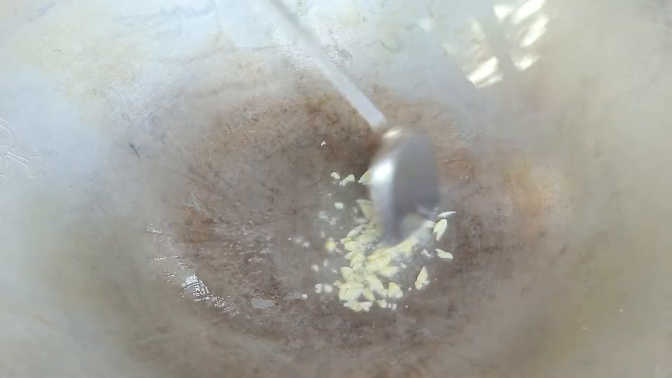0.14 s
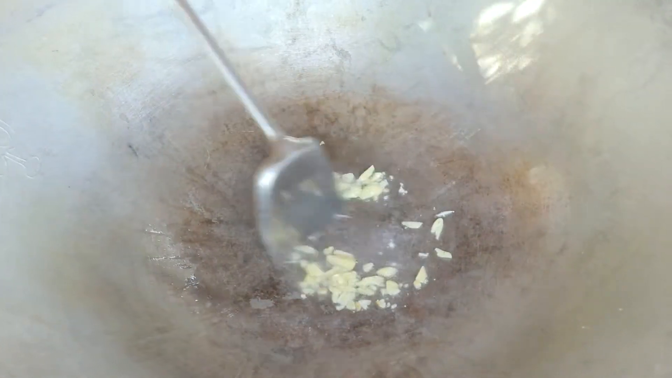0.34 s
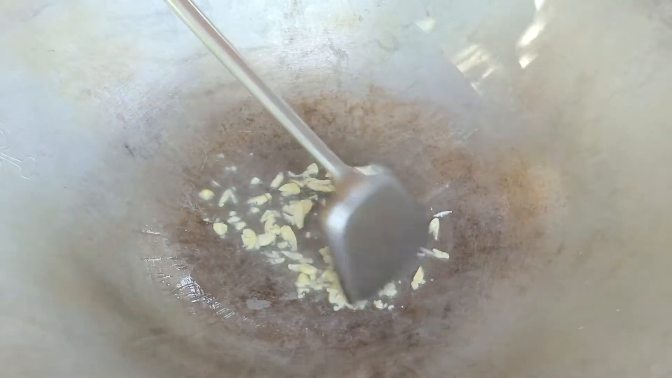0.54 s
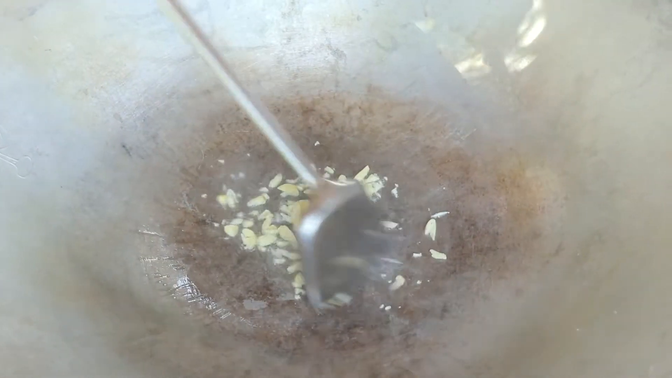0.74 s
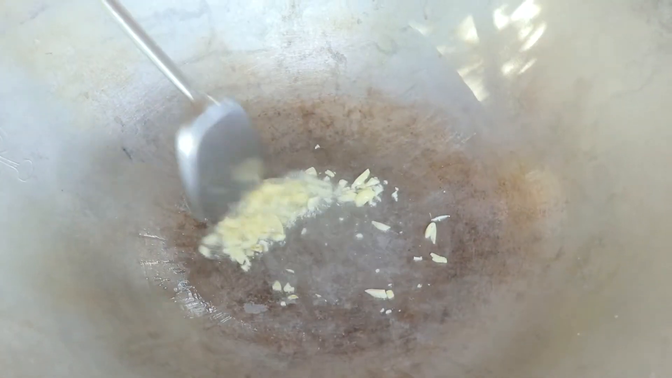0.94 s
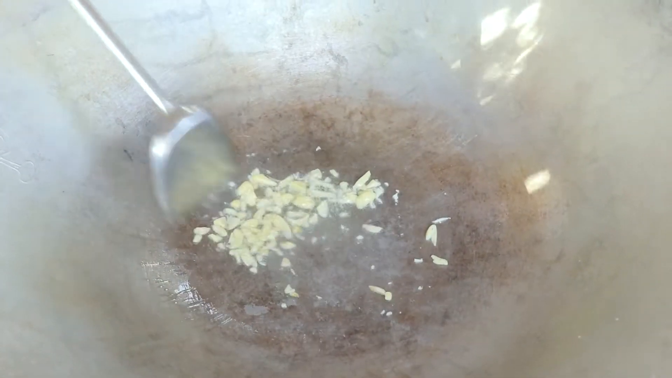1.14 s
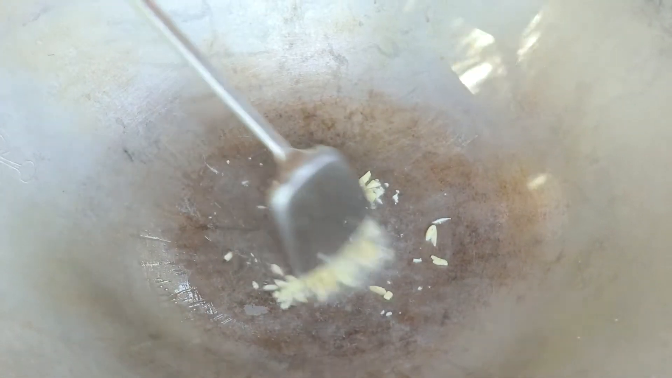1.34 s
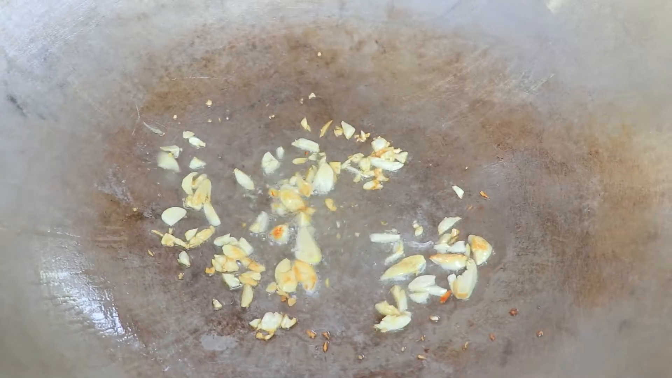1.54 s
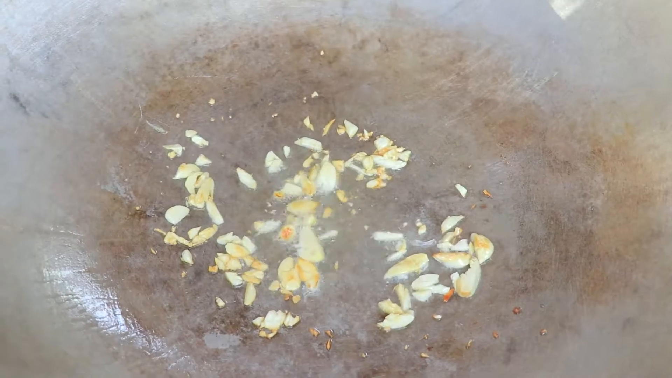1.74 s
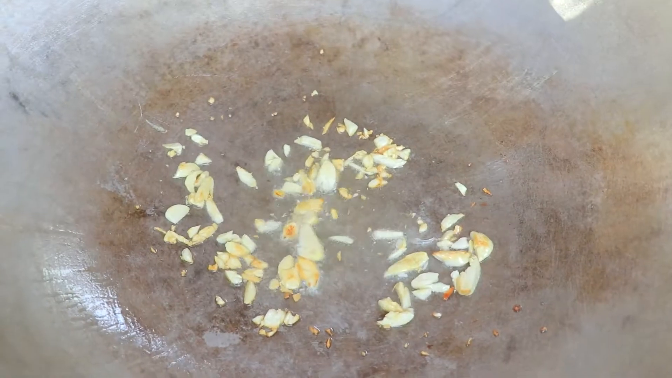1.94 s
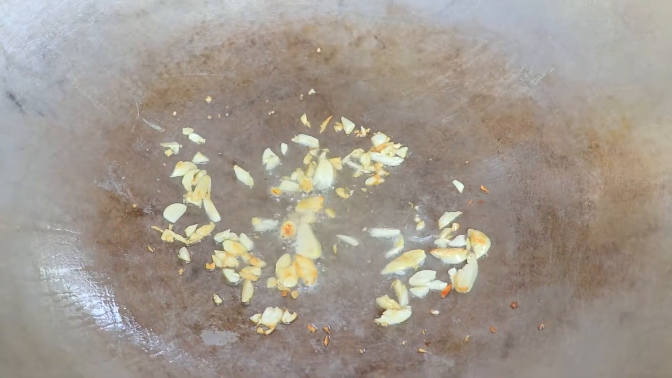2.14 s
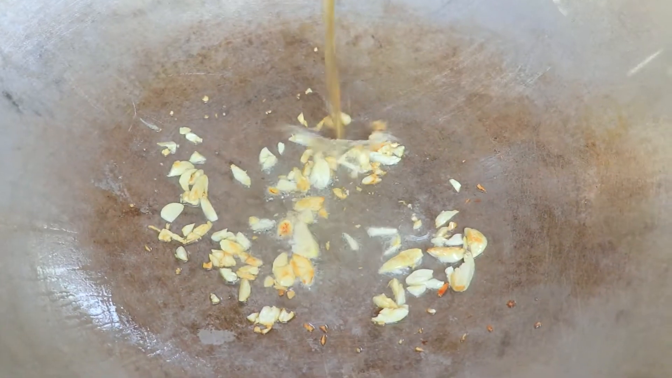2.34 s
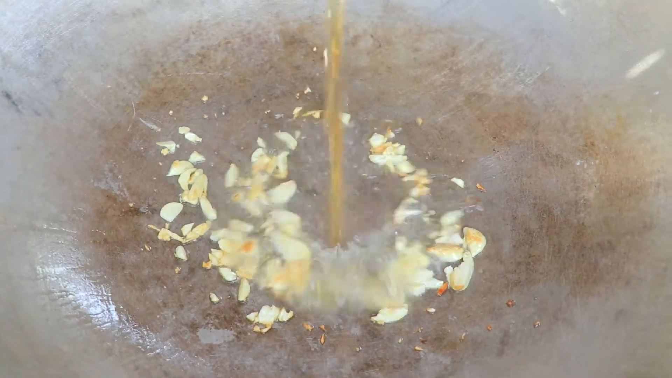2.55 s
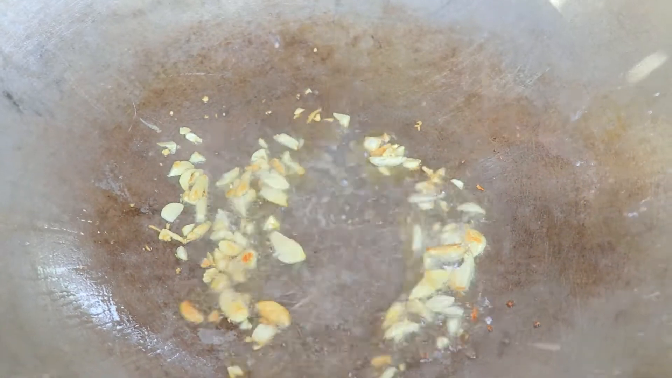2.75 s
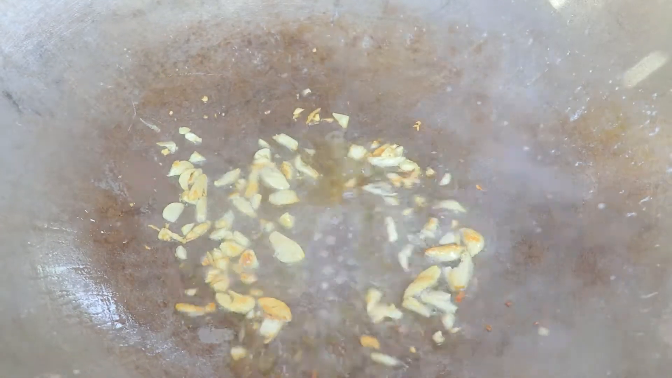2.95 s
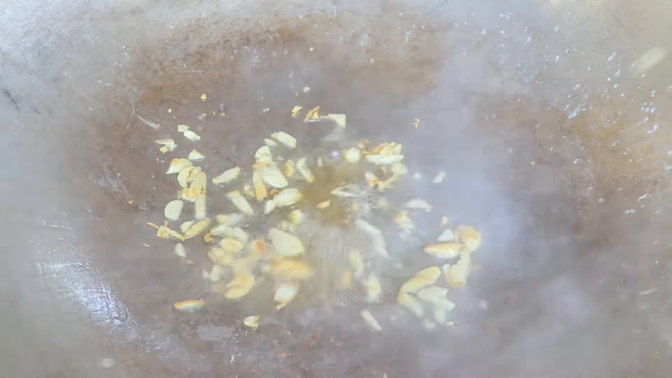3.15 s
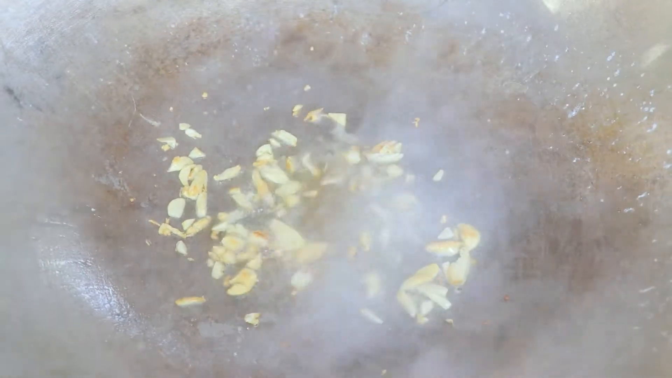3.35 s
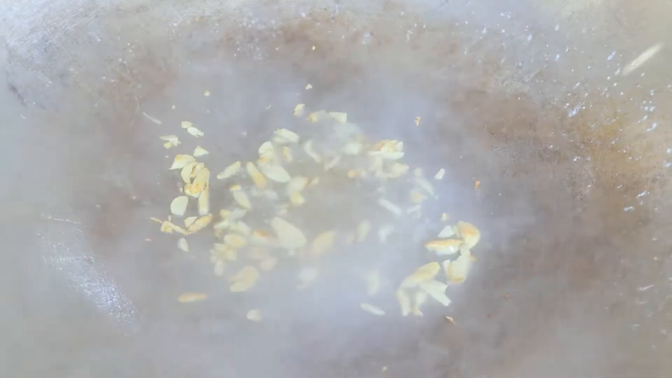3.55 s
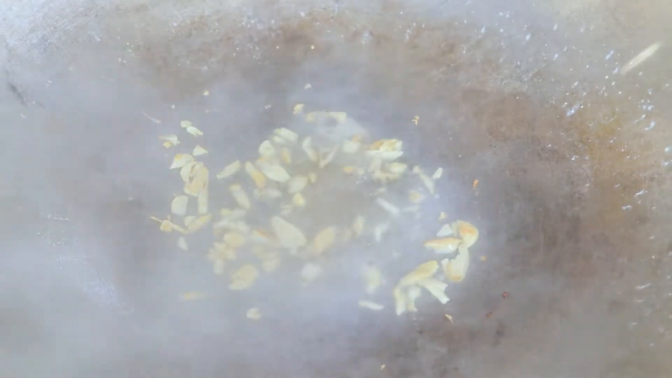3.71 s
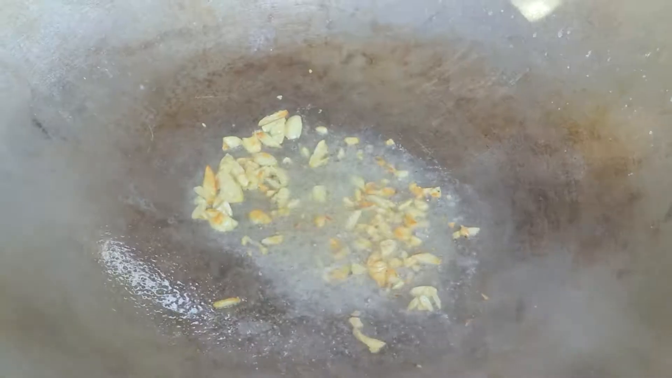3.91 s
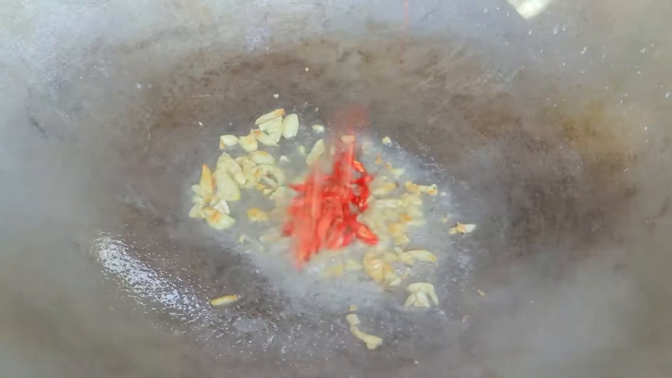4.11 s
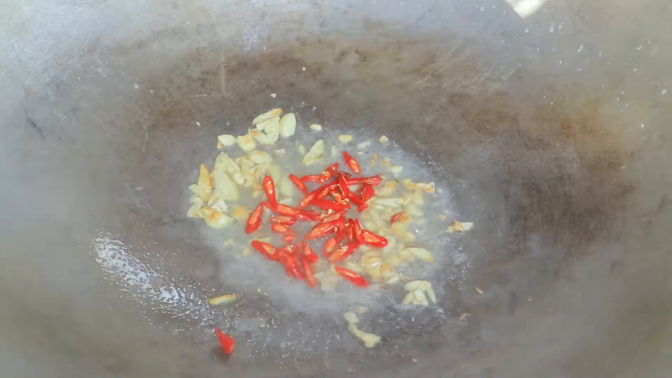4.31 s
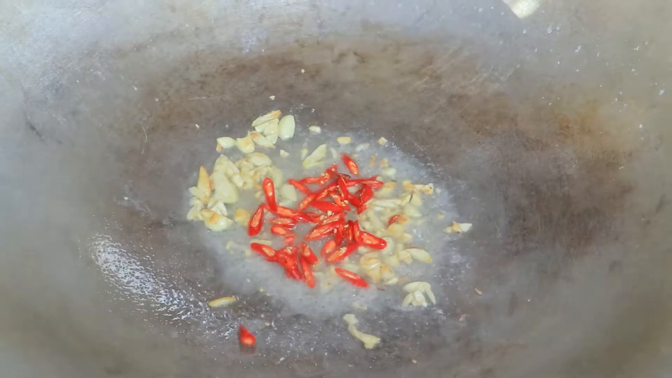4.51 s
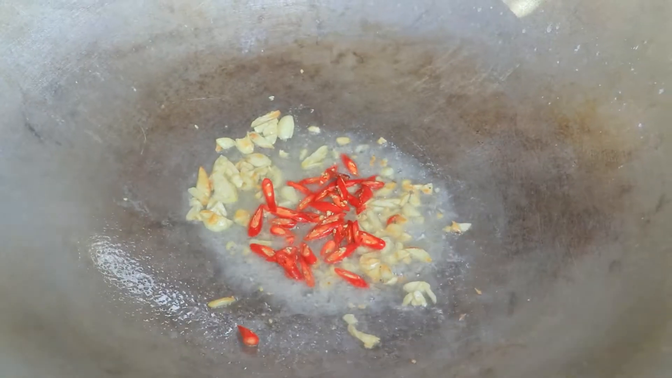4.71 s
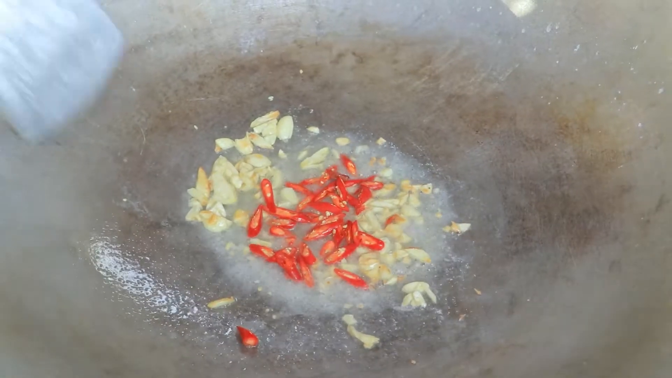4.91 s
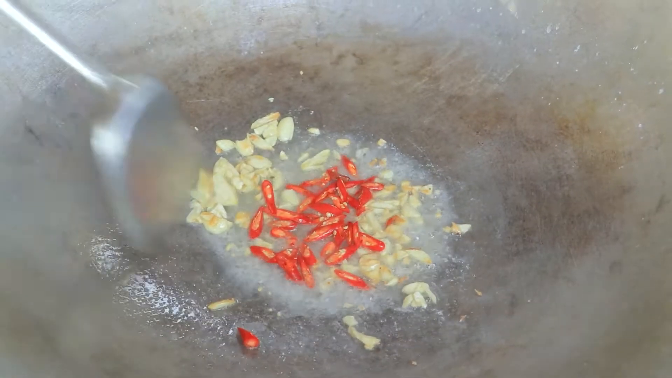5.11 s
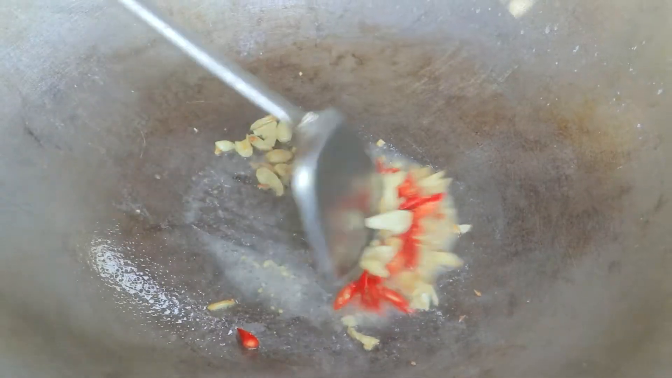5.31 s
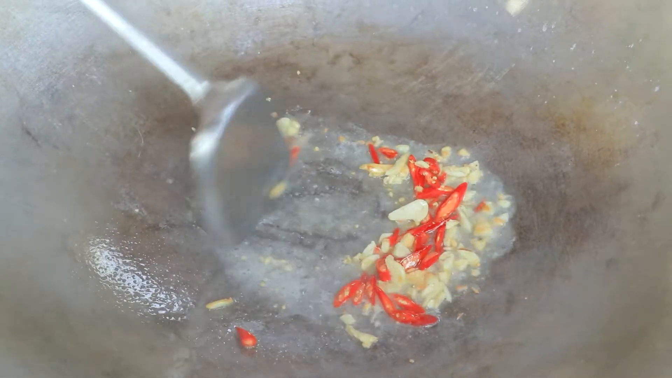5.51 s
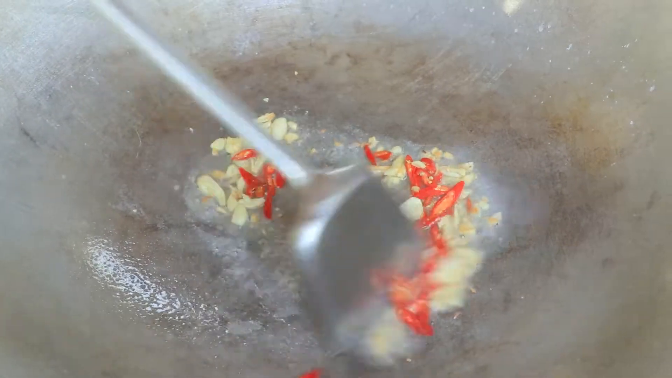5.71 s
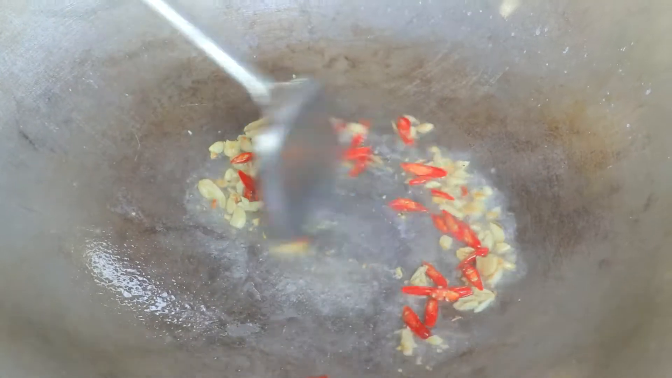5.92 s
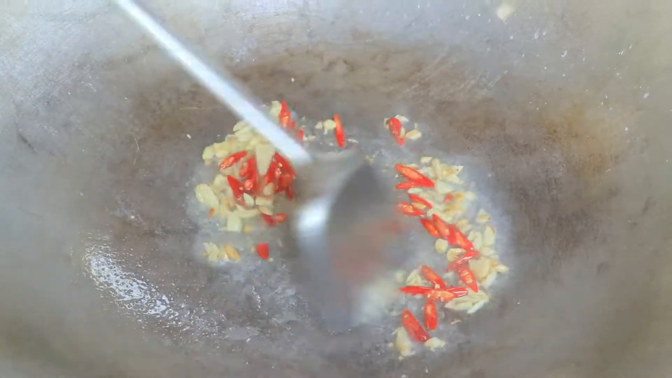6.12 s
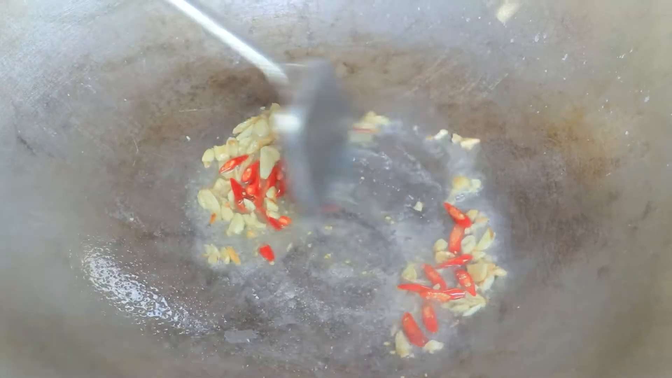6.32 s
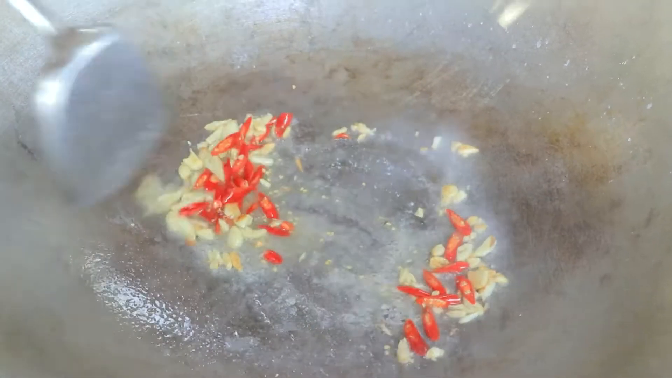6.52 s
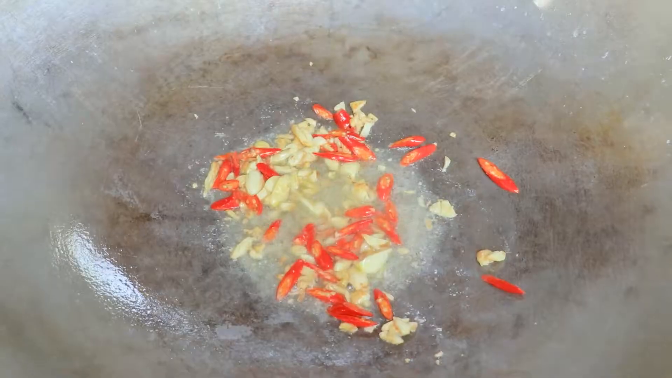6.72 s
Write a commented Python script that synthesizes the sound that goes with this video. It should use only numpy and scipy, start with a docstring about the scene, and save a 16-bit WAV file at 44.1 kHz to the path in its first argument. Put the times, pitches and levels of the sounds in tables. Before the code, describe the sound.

Garlic fries with a bright, crackling sizzle while a metal spatula scrapes and hits a steel wok with loud, overdriven clangs. It cuts to quiet oil ticking and spitting, then liquid is poured in and swells into a loud boiling hiss. Abruptly calmer, wet frying follows: chillies plop in, the spatula clanks twice and scrapes in long strokes. A close microphone outdoors, sound almost entirely in the left channel.

```python
"""Garlic fries in a steel wok outdoors: snaps and sizzle, scrapes and clangs of a spatula, spitting oil,
then liquid is poured in and boils up, and chillies are stirred in. The stages follow each other abruptly.
The sizzle is many tiny bursts plus hiss; snaps, spits and plops are short noise; scrapes are shaped noise;
blows mix noise with dying notes. One close microphone feeds the left channel, and the hardest blows
drive it into its limiter. The right channel carries only a trace."""
import sys
import numpy as np
from scipy import signal
from scipy.fft import rfft, irfft, next_fast_len
from scipy.io import wavfile
from scipy.ndimage import uniform_filter1d, minimum_filter1d, map_coordinates

SR = 44100
rng = np.random.default_rng(int(sys.argv[2]) if len(sys.argv) > 2 else 0)


def dump(signal):
    """Clip the signal to [-1, 1] and save it as 16-bit WAV at the path in sys.argv[1]."""
    limited = np.clip(np.atleast_2d(signal).T, -1, 1)
    pcm = np.round(limited * 32767).astype(np.int16)
    wavfile.write(sys.argv[1], SR, pcm)


N = 302526
TOP_HZ = 15850  # nothing is heard above this pitch

# All levels in the tables are relative: later gains still act on them.
# Colours of the sizzle: (frequency [Hz], gain [dB])
FRYING = [(88, -21), (150, -5), (193, -25), (302, -15.5), (404, -15.5), (561, -11), (1020, -7.5),
          (1240, -4.5), (2860, 0.5), (3550, -3), (4840, 1), (6470, -7.5), (7560, -5), (15500, -17.5)]
QUIET_OIL = [(290, -44), (500, -8.5), (927, -16), (1030, -19), (1450, -10), (2390, 0.5), (3530, -3),
             (5050, -0.5), (6550, -10), (7450, -7.5), (15500, -22)]
BOILING = [(71, -61), (120, -34), (260, -18), (432, -20), (498, -13.5), (1270, -6.5), (1650, -6.5),
           (2290, 0), (3050, 0), (3580, -6), (5170, -4), (6460, -10.5), (8770, -11), (11000, -16.5),
           (15500, -18.5)]
WET_OIL = [(120, -27), (200, -22), (392, -18.5), (596, -12), (653, -18), (769, -9.5), (974, -11),
           (1050, -8), (1650, -6), (1950, -1.5), (3890, -3.5), (4840, 0.5), (6470, -6), (7480, -4.5),
           (15500, -16)]
SIMMERING = [(180, -49), (300, -23), (863, -13.5), (1260, -12), (1460, -10), (1560, -17), (1870, -4),
             (3690, -6), (3870, -6), (5570, -2.5), (15500, -20.5)]
# Stages of the sizzle. Each drifts slowly in level; only the poured liquid builds up gradually,
# the other stages start at once:
# (start [s], end [s], colour, level above 6.5 kHz [dB], build-up time [s], drift [dB/s],
# bursts [1/s], spread of burst strength [dB], share of bursts in the power [0-1])
STAGES = [(0, 1.464, FRYING, -40, 0.00068, -3, 2970, 3, 0.62),
          (1.448, 2.421, QUIET_OIL, -59.5, .002, -5, 1700, 1, 0.3),
          (2.38, 3.863, BOILING, -31.5, 0.46, -1.4, 4260, 0.5, 0.36),
          (3.862, 6.672, WET_OIL, -42, .001, 0.29, 4000, 2.5, 0.09),
          (6.698, 6.9, SIMMERING, -47.5, .001, -2, 4700, 1, 0.08)]
# Colour of the bowl's low thud and rumble: (frequency [Hz], gain [dB])
BOWL = [(40, -53), (90, -23), (125, -2.5), (190, -2), (265, -2.5), (420, -8), (620, -13.5), (1000, -23),
        (4000, -67)]


def amp(db):
    """Decibels to gain."""
    return 10 ** (np.asarray(db) / 20)


def unit(x):
    """x scaled to an average strength (rms) of 1."""
    return x / np.sqrt(np.mean(x ** 2) + 1e-20)


def add(track, s, sound):
    """Mix a sound into the track at s seconds."""
    room = track[max(round(s * SR), 0):][:len(sound)]
    room += sound[:len(room)]


def gate(start, end, edge=0.0022):
    """1 between two times, with short ramps of edge seconds."""
    t = np.arange(N) / SR
    return np.clip(np.minimum(t - start, end - t) / edge + .5, 0, 1)


def bell(s, spread):
    """A smooth bell-shaped swell that reaches 1 at s seconds."""
    return np.exp(-.5 * ((np.arange(N) / SR - s) / spread) ** 2)


def wobble(rate):
    """A smooth random curve through rate random points a second."""
    knots = rng.standard_normal(int(N * rate / SR) + 4)
    steps = np.arange(0, N, 32)
    curve = map_coordinates(knots, [steps * rate / SR])
    return np.interp(np.arange(N), steps, curve)


def filtered(x, response):
    """x with each frequency multiplied by response(frequency)."""
    m = next_fast_len(len(x) + SR // 4)
    return irfft(rfft(x, m) * response(np.fft.rfftfreq(m, 1 / SR)), m)[:len(x)]


def coloured(x, points, size=4096):
    """x through a filter with the gain of the (Hz, dB) points and no sound ahead of its cause."""
    hz, db = np.transpose(points)
    gain = amp(np.interp(np.log(np.fft.rfftfreq(size, 1 / SR) + 1), np.log(hz), db))
    # Folding the cepstrum (the spectrum of the log gain) packs the filter's energy at its start.
    cepstrum = irfft(np.log(gain + 1e-6))[:size // 2]
    cepstrum[0] /= 2
    impulse = irfft(np.exp(rfft(2 * cepstrum, size)))
    return signal.fftconvolve(x, impulse)[:len(x)]


def band_unit(x, lo, hi):
    """x scaled so that the band from lo to hi Hz has rms 1."""
    return x / np.std(filtered(x, lambda hz: (hz > lo) & (hz < hi)))


def resonance(f, hz, width):
    """Response of one resonance, 1 at its centre."""
    return 1j * f * width / (hz * hz - f * f + 1j * f * width)


def burst(t60):
    """White noise that starts at once and falls by 60 dB in t60 seconds."""
    t = np.arange(SR // 4) / SR
    return rng.standard_normal(len(t)) * amp(-60 * t / t60)


def grains(rate, spread_db, length, life=0.00023, size=40):
    """Tiny bursts of every pitch, most weak and a few strong, scaled to rms 1."""
    when, pitch, chance = rng.random((int(rate * length / SR), 3)).T
    t = np.arange(size) / SR
    strength = amp(-spread_db * np.log(chance + .006))
    waves = np.cos(2 * np.pi * TOP_HZ * pitch[:, None] * t) * np.exp(-t / life)
    waves = strength[:, None] * waves
    places = (when * length).astype(int)[:, None] + np.arange(size)
    return unit(np.bincount(places.ravel(), waves.ravel(), length)[:length])


def patchy(x, depth_db, size, count):
    """x with patches of its spectrum that come and go, each lasting about count frames."""
    z = signal.stft(x, nperseg=size)[2]
    field = uniform_filter1d(rng.standard_normal(z.shape), 2, axis=0)
    field = uniform_filter1d(field, count, axis=1)
    return signal.istft(z * amp(depth_db * unit(field)), nperseg=size)[1][:N]


def puff(sound, size=220):
    """A sound scaled so that its first 5 ms peak near 1."""
    return sound / (np.sqrt(2 * np.pi) * np.std(sound[:size]))


def even(x, size=1100):
    """x held near rms 1, as under a steady hand."""
    return x / np.sqrt(np.abs(uniform_filter1d(x ** 2, size)) + 1e-9)


def sizzle():
    """Bubbles burst over a hiss of steam, in proportions, colour and level set by each stage."""
    # The sizzle swells or dips as the food shifts: (time [s], level change [dB], spread in time [s])
    swells = [(.85, 0.5, 0.29), (1.422, -2, 0.057), (4.64, 0.5, 0.14), (5.297, -1.5, 0.19),
              (6.358, 1.5, 0.11)]
    coarse_hz, coarse_build_s = 2100, 0.23  # in poured liquid the large, low bubbles come later
    out = np.zeros(N)
    for start, end, colour, level_db, build_s, drift_db, rate, spread_db, share in STAGES:
        fade = gate(start, end)
        span = np.flatnonzero(fade)
        age = np.arange(len(span)) / SR
        bubbles = grains(rate, spread_db, len(span))
        steam = rng.standard_normal(len(span))
        fizz = np.sqrt(share) * bubbles + np.sqrt(1 - share) * steam
        fizz = band_unit(coloured(fizz, colour), 6500, 15000)
        if colour == BOILING:
            coarse = filtered(fizz, lambda hz: 1 / (1 + (hz / coarse_hz) ** 2))
            fizz = fizz - np.exp(-age / coarse_build_s) * coarse
        build_up = 1 - np.exp(-age / build_s)
        out[span] += fade[span] * build_up * amp(level_db + drift_db * age) * fizz
    swell_db = sum(db * bell(s, spread) for s, db, spread in swells)
    unsteady = out * amp(swell_db + 0.62 * wobble(45))
    return patchy(unsteady, depth_db=0.8, size=256, count=8)


def snaps(count=36):
    """Frying garlic cracks in sharp noise bursts: some set loud ones, and small ones at random."""
    # The loudest dry snaps: (time [s], peak level [dB])
    loud = [(0.35, -18), (.278, -14), (.378, -16), (.488, -18), (.5955, -24), (.867, -14), (0.885, -17),
            (0.924, -18), (.965, -14.5), (1.074, -11), (1.152, -17), (1.2333, -11), (1.294, -16)]
    loudest_db, range_db = -22.5, 13  # small snaps: loudest peak, range below it
    out = np.zeros(N)
    small = [(when * STAGES[0][1], loudest_db - range_db * weak) for when, weak in rng.random((count, 2))]
    for s, db in loud + small:
        crack = burst(t60=.0018) + .04 * burst(t60=.025)
        crack = coloured(crack, [(150, -33), (1300, 2.5), (3000, 1.0), (5500, 2), (9000, -13), (15000, -16)])
        add(out, s, amp(db) * crack / abs(crack).max())
    return out


def scrapes():
    """The edge slips over steel, louder with each push; resonances shift and the bowl rumbles."""
    # Colours of the grating in a dry and a wet pan: (frequency [Hz], gain [dB])
    dry_grating = [(100, -61), (400, -38), (560, -17), (950, -21), (1080, -4), (1400, -7.5), (1700, 0),
                   (1880, -4.5), (2150, 3.5), (2650, 0), (3200, -0.5), (3700, -11.5), (5200, -11.5),
                   (9000, -40), (15000, -60)]
    wet_grating = [(100, -36.5), (430, -64), (650, -10), (790, -19), (950, -14), (1090, -6.5), (1380, -2),
                   (1560, -7), (2050, -2), (2400, 1.5), (3050, -5.5), (3800, -12.5), (5300, -16),
                   (12000, -37)]
    # Drags of the spatula: (touch [s], lift [s], scrape level [dB], rumble level of the bowl [dB],
    # fading of the rumble [dB/s], state of the pan)
    drags = [(0.042, 0.359, -32, -42.5, 23, "dry"), (0.378, 0.413, -32.5, -60, 0, "dry"),
             (0.805, 0.939, -36.5, -44.5, 132, "dry"), (1.112, 1.15, -38, -43, 100, "dry"),
             (1.185, 1.448, -39.5, -55, 67, "dry"), (5.463, 6.387, -33, -46.5, -2.5, "wet")]
    # Pushes of the hand, each a smooth swell of the scrape: (time [s], level [dB], spread in time [s])
    pushes = [(0.172, -28.5, 0.043), (0.262, -26.5, 0.028), (0.338, -30.5, 0.023), (0.815, -28.5, 0.029),
              (1.203, -32, 0.014), (5.5, -25, 0.03), (5.67, -28.5, .04), (5.762, -27, 0.015),
              (5.962, -24, 0.04), (6.12, -23, 0.046), (6.332, -22.5, 0.03)]
    # The blade chatters and makes the bowl drone: (time [s], pitch [Hz], level [dB], spread in time [s])
    squeals = [(0.278, 2640, -25, 0.0086), (.927, 3120, -25.5, 0.0031), (1.363, 3010, -28, 0.0043),
               (5.495, 2340, -27, 0.016), (5.7, 1783, -29.5, 0.023), (5.712, 138.5, -40, 0.031),
               (5.937, 2310, -26, 0.035), (6.149, 2040, -20.5, 0.028)]
    # The bowl's note wanders with the point of contact.
    drone_hz, drone_wander_hz, wander_per_s = 269.4, 27.96, 9

    slips = grains(1200, spread_db=1.5, length=N) + 0.5 * rng.standard_normal(N)
    slips = patchy(slips * amp(1.6 * wobble(110)), depth_db=4.5, size=2048, count=4)
    dry_scrape, wet_scrape, rumble = [even(coloured(slips, c)) for c in (dry_grating, wet_grating, BOWL)]
    phase = 2 * np.pi * np.cumsum(drone_hz + drone_wander_hz * wobble(wander_per_s)) / SR
    note = wobble(50) * np.sin(phase) + wobble(50) * np.cos(phase)
    drone = 0.81 * note + 0.63 * rumble

    out, t = np.zeros(N), np.arange(N) / SR
    push_power = sum((amp(db) * bell(s, spread)) ** 2 for s, db, spread in pushes)
    for touch, lift, scrape_db, rumble_db, fading_db, state in drags:
        grate, low = (wet_scrape, drone) if state == "wet" else (dry_scrape, rumble)
        force = np.sqrt(amp(scrape_db) ** 2 + push_power)
        age = np.clip(t - touch, 0, lift - touch)
        out += gate(touch, lift) * (force * grate + amp(rumble_db - fading_db * age) * low)
    waver = 0.59 * wobble(130)
    for s, hz, db, spread in squeals:
        out += amp(db) * bell(s, spread) * np.sin(2 * np.pi * hz * t + waver)
    return out


def blows():
    """Steel on steel: a crash, a short note of the blade, a thud of the bowl and the modes of the wok."""
    # Blows of the spatula: (time [s], level [dB], thud level against the crash [dB],
    # pitch of the blade [Hz], time for the crash to fall by 60 dB [s])
    hits = [(0.659, -5.5, -9.5, 1930, 0.075), (0.6648, -1, -21, 2820, 0.04), (0.688, -26, -2, 2020, 0.034),
            (0.798, -20, -10, 2670, 0.047), (1.1638, -6.5, -7.5, 1900, 0.03), (1.168, -9, -19, 2494, 0.055),
            (1.202, -17, -19, 2500, 0.069), (1.234, -21, -10, 1680, 0.027), (5.1213, -5, -14.5, 2526, 0.06),
            (5.1403, -8, -35, 2100, 0.045), (5.1434, -13, -29, 2580, 0.077),
            (5.467, -28.5, -7.5, 2220, .05), (5.733, -24, -28, 2200, 0.045)]
    # The wok rings on where the blade bounces clear:
    # (time [s], pitch [Hz], level [dB], time to fall by 60 dB [s], rise time [s], width of the note [Hz])
    rings = [(.674, 1072, -10.5, .22, .026, .8), (1.166, 1911, -22, .15, .004, 6),
             (5.122, 4346, -17, .07, .002, 12), (5.14, 1238, -32, .28, .008, 14),
             (5.14, 1440, -24, .22, .008, 14), (5.14, 2550, -16, .09, .002, 10),
             (5.14, 3435, -23, .17, .004, 8), (5.14, 4070, -21, .08, .002, 10)]
    # Modes, the wok's own notes: (pitch [Hz], relative level [dB], time to fall by 60 dB [s])
    steel = [(123, -11.5, 0.24), (173, -7.5, 0.12), (281, -14.5, 0.14), (1062, -4, 0.31),
             (1250, -10.5, 0.84), (1460, -16.5, 0.68), (1738, -8, 0.2), (1903, 1.5, 0.21), (2060, -7, 0.35),
             (2390, -1, 0.15), (2570, -16, 0.17), (2710, -14, 0.35), (3360, -5, 0.34), (3580, -19, 0.31),
             (3900, -16, 0.091), (4270, -6, 0.078)]
    # Colour of the crash: (frequency [Hz], gain [dB])
    crash_colour = [(80, -46), (500, -21.5), (700, -15.5), (1050, -9.5), (1450, -16), (1900, -12.5),
                    (2250, -3), (2600, -3), (3100, -10.5), (4200, -10.5), (5500, -11.5), (6300, -21.5),
                    (9000, -20.5), (15500, -42)]
    out, t = np.zeros(N), np.arange(SR // 4) / SR

    def swell(rise):
        """A soft start that builds up over about rise seconds."""
        return 1 - np.exp(-t / rise)

    def tone(hz, t60, width_hz):
        """A dying note; the rattling contact makes its phase wander."""
        wander = np.cumsum(rng.standard_normal(len(t))) * np.sqrt(2 * np.pi * width_hz / SR)
        wave = np.sin(2 * np.pi * (hz * t + rng.random()) + wander)
        return wave * np.exp(-np.log(1000) * t / t60)

    for s, db, thud_db, blade_hz, crash_t60 in hits:
        crash = burst(crash_t60) + 0.097 * burst(3 * crash_t60)
        crash = puff(coloured(crash, crash_colour))
        thud = amp(thud_db) * puff(coloured(burst(t60=0.033), BOWL))
        blade = amp(-5) * tone(blade_hz, 1.42 * crash_t60, width_hz=31)
        modes = np.zeros(len(t))
        for hz, level_db, t60 in steel:
            modes += amp(level_db + rng.normal(0, 2)) * tone(hz, t60, width_hz=.008 * hz)
        notes = swell(0.00084) * (blade + amp(-22) * modes)
        add(out, s, amp(db + 1.36) * (crash + thud + notes))
    for s, hz, db, t60, rise, width_hz in rings:
        add(out, s, amp(db) * tone(hz, t60, width_hz) * swell(rise))
    # The thin bowl radiates no deep bass.
    return signal.sosfilt(signal.butter(4, 110, "high", fs=SR, output="sos"), out)


def spits(count=48):
    """Drops burst at their own pitch and echo in the hollow of the wok; the tiniest are shrill ticks."""
    # The larger drops that burst in the oil: (time [s], level [dB], pitch [Hz])
    drops = [(1.508, -30.5, 5330), (1.549, -35, 7240), (1.6232, -33, 5040), (1.6627, -30, 5000),
             (1.7404, -25, 3200), (1.8464, -30, 4800), (1.8647, -30, 4900), (1.879, -25.5, 4200),
             (1.942, -19.5, 2500), (2.0715, -27.5, 4800), (2.1122, -25.5, 3860), (2.1605, -26, 1700),
             (2.1965, -30, 4850), (2.226, -27.5, 3640), (2.2593, -26, 5030), (2.299, -31, 5060),
             (2.353, -34, 4320), (2.3653, -30.5, 2980), (2.41, -27, 3580)]
    # Resonances of the air in the wok: (pitch [Hz], width [Hz], relative level [dB])
    hollow = [(1060, 55, 14), (1270, 88, 15), (1530, 80, 2), (1640, 43, 9), (2240, 120, 7), (2450, 200, -1),
              (3030, 150, -17)]
    out = np.zeros(N)
    for s, db, hz in drops:
        pop = filtered(burst(t60=0.077),
                       lambda f: resonance(f, hz, 1200) ** 2 + 0.23 * resonance(f, 2980, 2300) ** 2)
        add(out, s, amp(db - 3.5) * puff(pop))
    start, end = STAGES[1][:2]  # the ticks come while the garlic rests
    for when, pitch, weakness in rng.random((count, 3)):
        tick = filtered(burst(t60=0.0085), lambda f: resonance(f, 5200 + 4300 * pitch, 1500) ** 2)
        add(out, start + (end - start) * when, amp(-39 - 23 * weakness) * puff(tick))
    # A faint hiss also excites the hollow.
    air = out + amp(-55.0) * gate(1.463, 2.5) * rng.standard_normal(N)
    echo = filtered(air, lambda f: sum(amp(db) * resonance(f, hz, width) for hz, width, db in hollow))
    return out + amp(-4.0) * echo


def plops():
    """Liquid and food land on the steel: dull pats of dying noise through a broad resonance."""
    # Soft landings: (time [s], peak level [dB], pitch [Hz], time for the noise to fall by 60 dB [s])
    landings = [(1.528, -51.5, 220, 0.028), (2.159, -38.5, 620, 0.017), (2.539, -44.5, 615, 0.083),
                (2.719, -48, 150, .3), (4.125, -32.5, 1240, 0.48), (4.14, -50, 260, .2),
                (4.19, -50, 160, 0.092), (5.305, -40, 397, 0.055)]
    out = np.zeros(N)
    for s, db, hz, t60 in landings:
        pat = filtered(burst(t60), lambda f: resonance(f, hz, 1.16 * hz) ** 2)
        add(out, s, amp(db) * pat / abs(pat).max())
    return out


def scene():
    """The wok over a faint outdoor rumble; the sound breaks off for a moment before the last stage."""
    # Colour of the outdoor rumble: (frequency [Hz], gain [dB])
    outdoors = [(12, -47), (20, -1), (87, 1.5), (134, 2.5), (255, -8), (418, -9.5), (496, -2), (800, -28),
                (1040, -45), (1760, -120)]
    air = amp(-68.5) * unit(coloured(rng.standard_normal(N), outdoors))
    wok = sizzle() + snaps() + scrapes() + blows() + spits() + plops()
    silence = gate(6.673, 6.697)
    return (wok + air) * (1 - silence) * np.ones((2, 1))


def record(dry, size=48):
    """A fast limiter and clipping hold the left channel; the right has a trace of it and faint hiss."""
    left = 2 * dry[0]
    needed = 1 / np.maximum(np.abs(left) / 1.15, 1)
    # The gain turns down just around each peak, about 1 ms wide, and is then smoothed.
    limiter = uniform_filter1d(minimum_filter1d(needed, size), size)
    left = np.clip(left * limiter, -1, 1)
    hiss = unit(coloured(rng.standard_normal(N), [(50, -2), (500, -1), (15000, -1)]))
    right = amp(-63) * dry[1] + amp(-75.5) * hiss
    return np.array([filtered(side, lambda hz: hz < TOP_HZ) for side in (left, right)])


dry = scene()
out = record(dry)
dump(out)
```